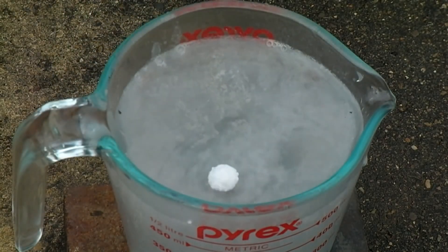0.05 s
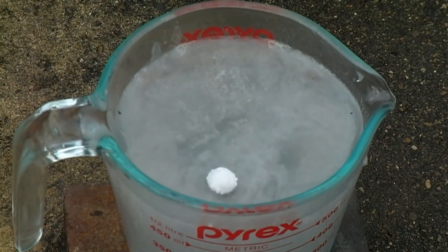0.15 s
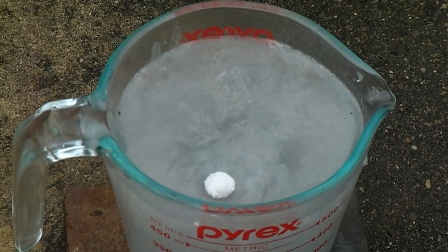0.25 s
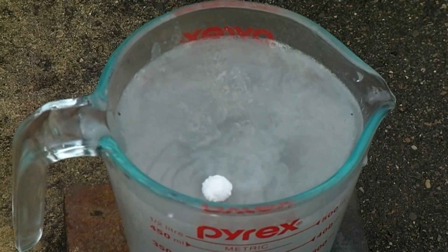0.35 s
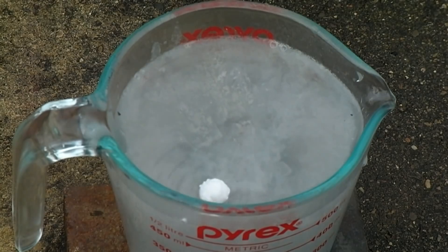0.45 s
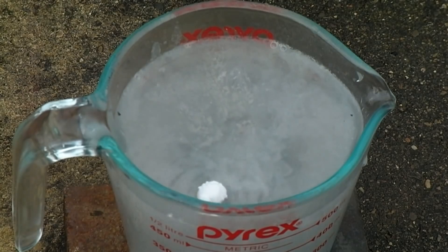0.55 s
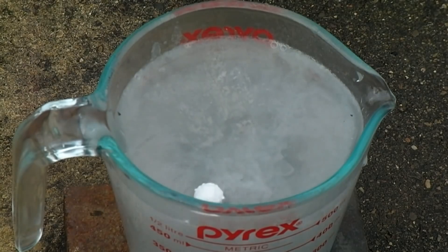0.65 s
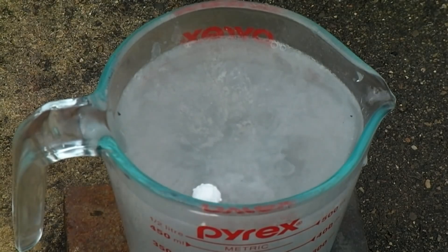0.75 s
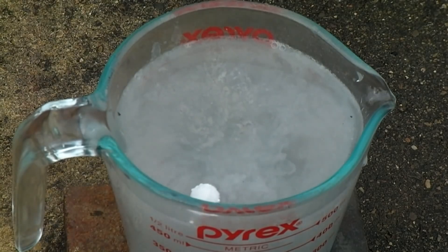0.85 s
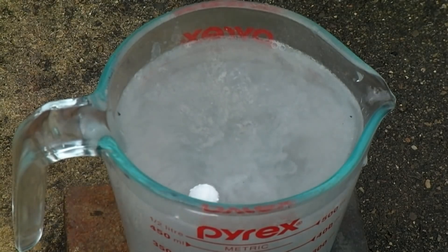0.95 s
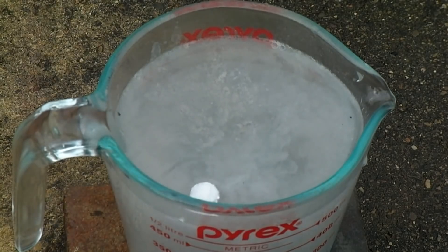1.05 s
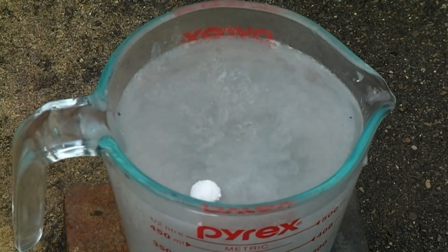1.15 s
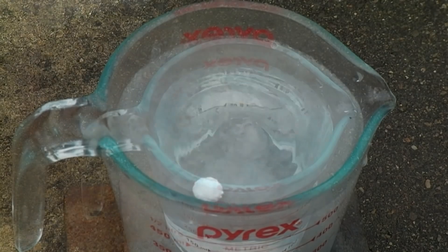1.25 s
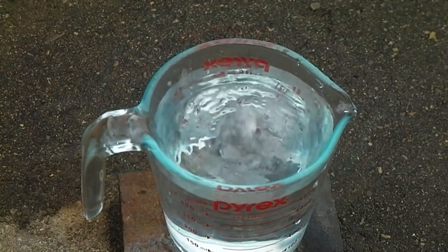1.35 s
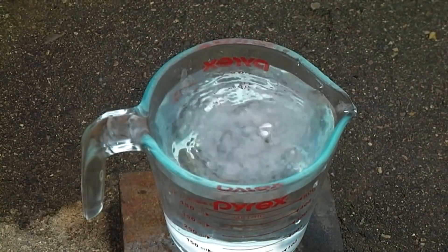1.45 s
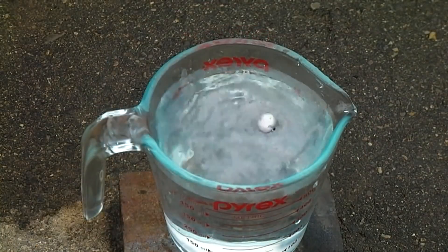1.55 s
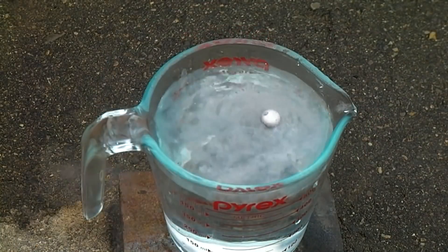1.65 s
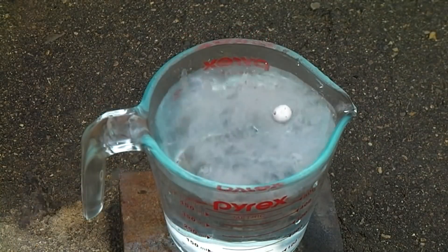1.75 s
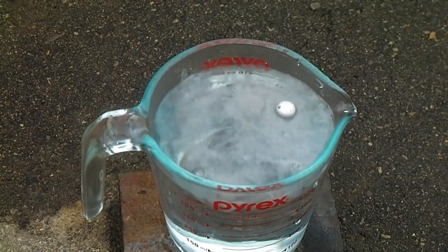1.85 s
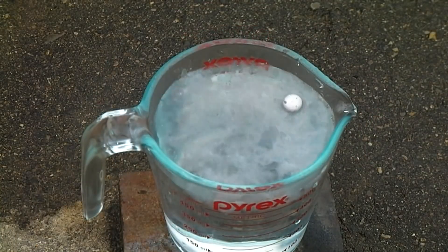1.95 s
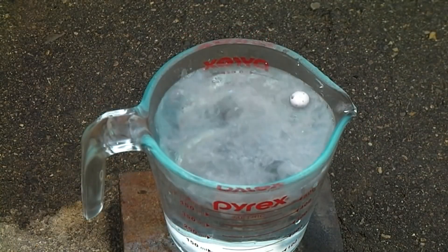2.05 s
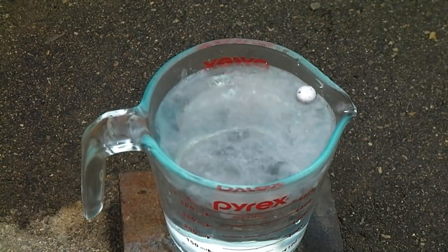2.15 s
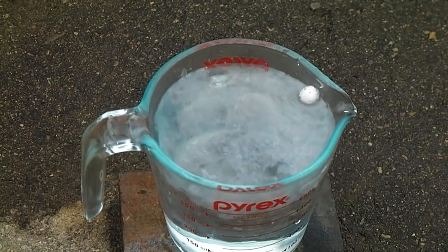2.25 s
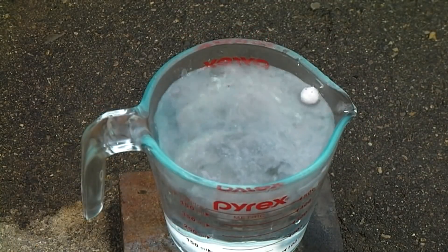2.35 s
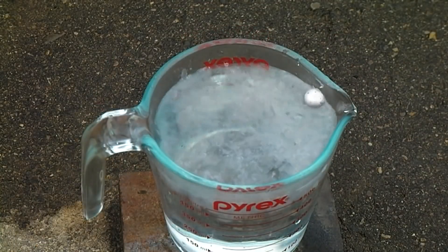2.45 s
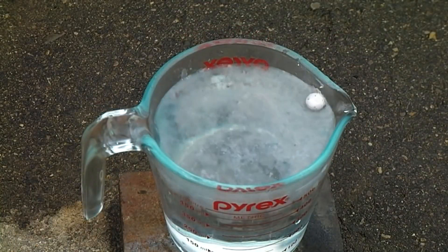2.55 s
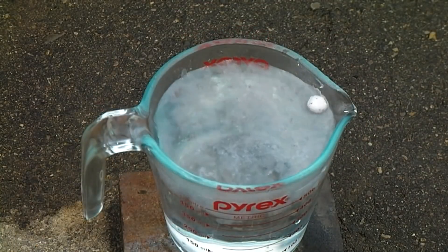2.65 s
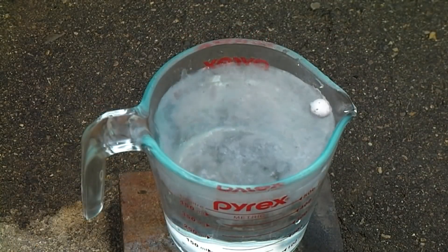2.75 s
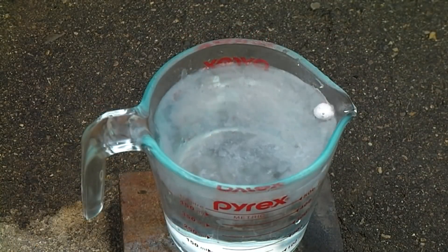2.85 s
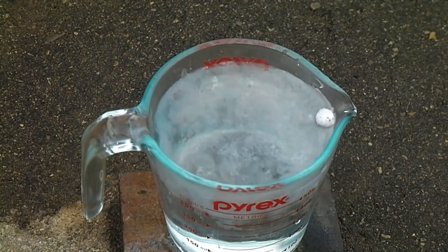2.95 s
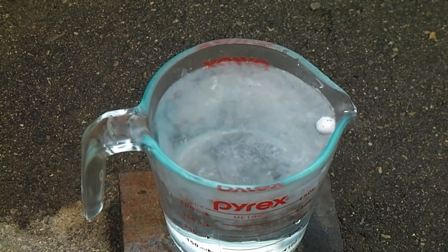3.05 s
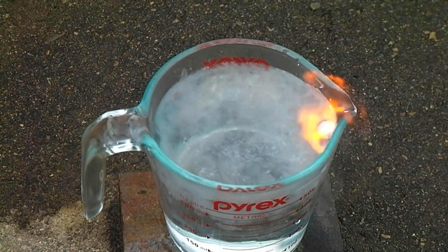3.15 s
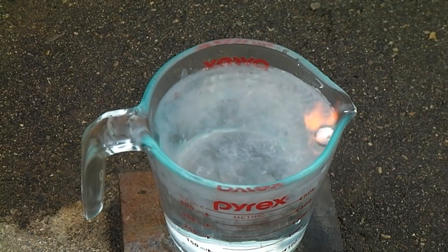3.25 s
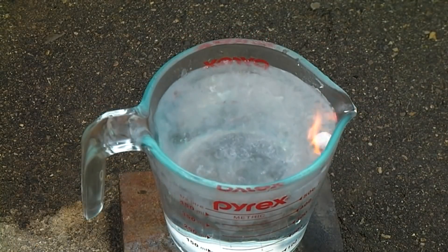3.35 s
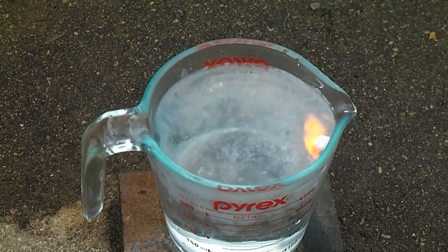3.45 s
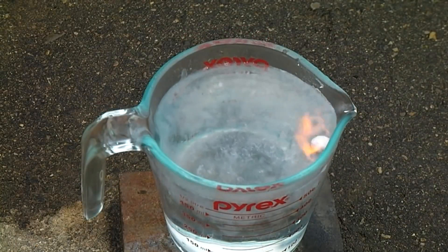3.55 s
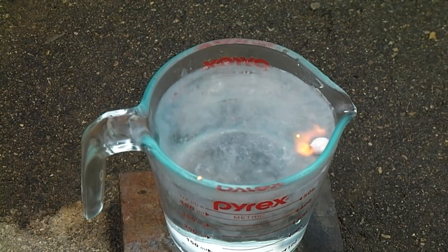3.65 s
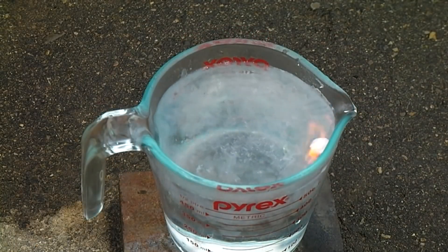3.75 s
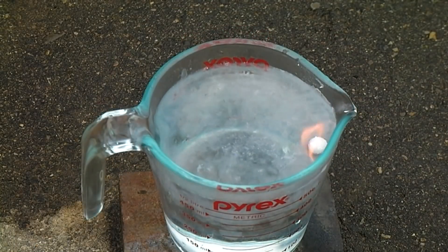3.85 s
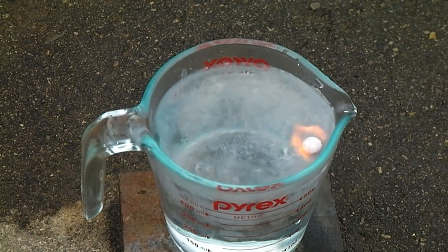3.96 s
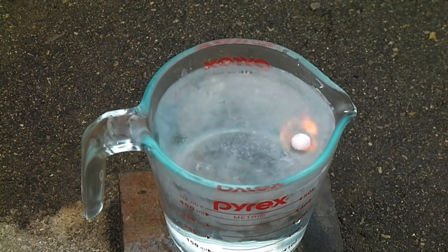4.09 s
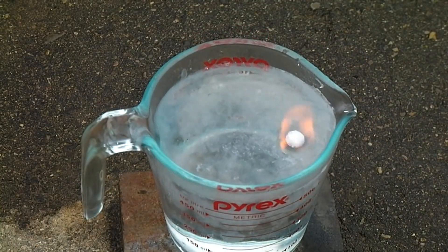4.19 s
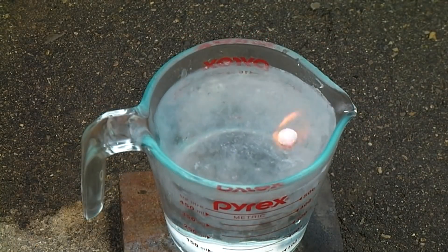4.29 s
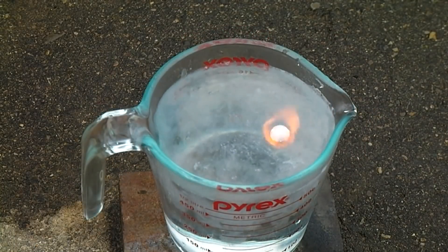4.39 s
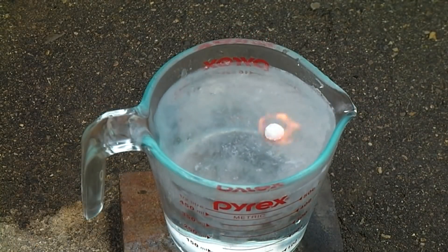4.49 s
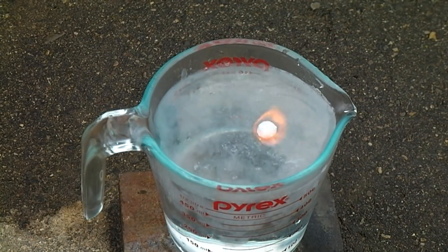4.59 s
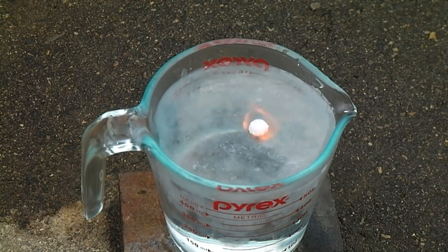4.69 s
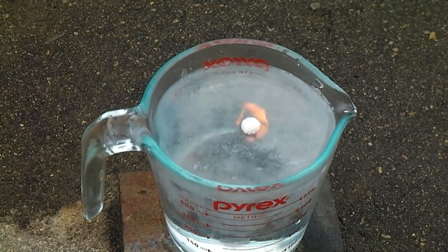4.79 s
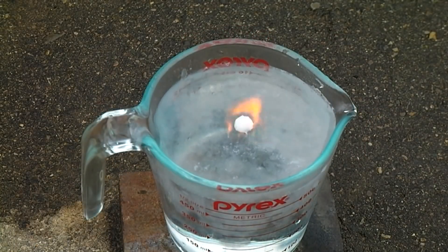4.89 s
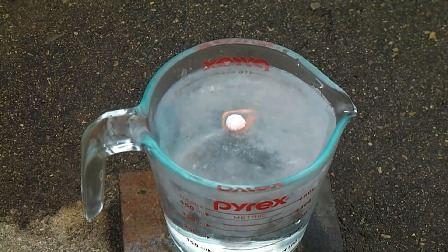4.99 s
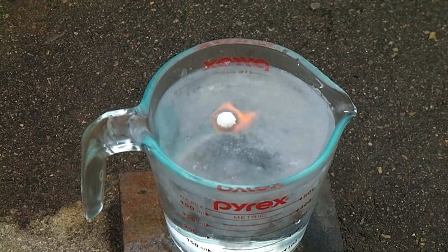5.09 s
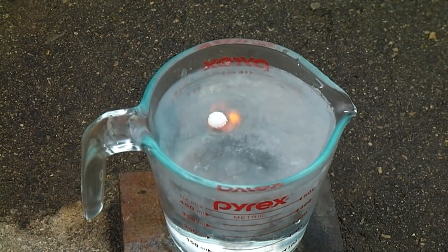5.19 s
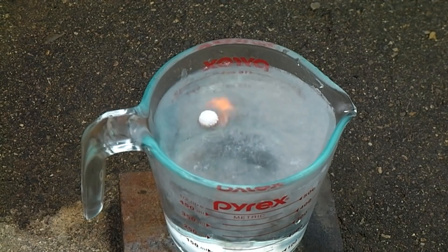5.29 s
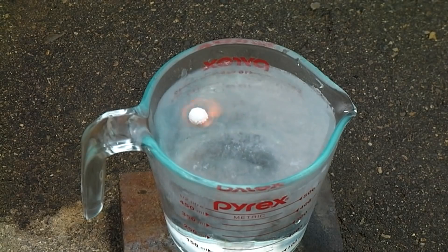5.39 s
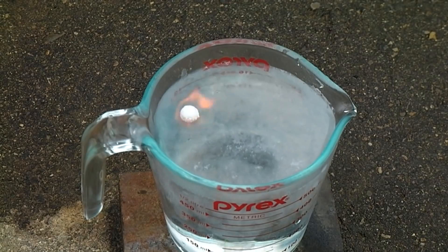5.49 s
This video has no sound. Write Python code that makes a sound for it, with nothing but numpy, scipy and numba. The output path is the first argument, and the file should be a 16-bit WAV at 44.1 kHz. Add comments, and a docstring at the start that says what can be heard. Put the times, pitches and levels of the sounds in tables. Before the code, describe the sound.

Outdoors, close to a stereo microphone, sodium fizzes steadily on water in a glass jug while a faint, far machine hum fades. The fizz cuts out briefly; another lump lands with a small plip and hisses in surges, spitting as it wanders. A single sharp pop marks the gas catching fire. Afterwards the hiss is quieter and sputtering, with fine bubble crackle and a slight low flutter, over a weak distant rumble.

```python
"""A close, fizzing hiss: sodium skates on water in a glass jug outdoors, just before a microphone pair.
Hydrogen and steam escape from under it in tiny bursts, and bubbles crackle. The hiss stops abruptly;
a fresh lump plops in, fizzes and spits, then its gas lights with one sharp pop and it burns more quietly.
The jug colours the hiss as the lump wanders. Far behind lie a low rumble and a machine hum that fades."""
import sys
import numpy as np
from scipy import signal
from scipy.fft import rfft, irfft
from scipy.io import wavfile
from scipy.ndimage import uniform_filter1d
from numba import njit

SR = 44100
rng = np.random.default_rng(int(sys.argv[2]) if len(sys.argv) > 2 else 0)


def generate_wav(signal):
    """Clip the signal to [-1, 1] and save it as 16-bit WAV at the path in sys.argv[1]."""
    frames = np.transpose(np.atleast_2d(signal))
    scaled = np.clip(frames, -1, 1) * 32767
    pcm = np.round(scaled).astype(np.int16)
    wavfile.write(sys.argv[1], SR, pcm)


N = 243873
T = np.arange(N) / SR

# far-off rumble: freq_hz, gain_db
RUMBLE_SPECTRUM = [(20, -5), (35, -9.5), (52, -6.5), (80, 2), (120, 1.5), (160, -3), (200, -12.5),
                   (270, -18), (390, -6.5), (600, -16.5), (1200, -16.5), (4000, -21)]
# its course: time_s, relative_db
RUMBLE_LEVELS = [(0, -51.5), (1.4, -51), (1.9, -53), (2.25, -55), (3.2, -54), (5.53, -53.5)]
# distant machine: time_s, pitch_hz, level_db
MACHINE_HUM = [(0, 130.2, -45.5), (.55, 131.2, -49.5), (1.2, 129.9, -54), (1.4, 127, -60), (1.6, 129, -95)]
# flutter of the burning gas: time_s, level_db
FLAME_LEVELS = [(3.25, -85), (3.9, -73), (4.1, -52.5), (4.35, -53), (4.55, -72), (5.0, -57), (5.53, -54)]
# air trapped by the landing lump: start_s, level_db, pitch_hz, hold_s, decay_s, glide_hz_per_s
AIR_POCKETS = [(1.426, -30, 2230, 0.0063, .0015, 10000), (1.4693, -28.5, 1870, 0.0021, 0.012, 92000)]
# water rocking in the jug: centre_s, level_db, half_length_s
WATER_SLOSHES = [(1.78, -55.5, 0.19), (1.944, -57, 0.056), (2.343, -52, 0.061)]
# spits of gas and droplets: start_s, relative_db, pitch_hz, decay_s
GAS_SPITS = [(1.355, -19.5, 9500, 0.0016), (1.393, -35, 1000, 0.0047), (1.499, -27.5, 4470, 0.019),
             (1.757, -36.5, 1370, 0.01), (1.795, -40, 2500, .002), (1.896, -39.5, 470, 0.0072),
             (1.944, -37.5, 899, 0.015), (2.438, -37.5, 1400, 0.016), (2.473, -31, 1510, 0.0045),
             (2.664, -36.5, 447, 0.0042), (2.858, -42, 800, 0.025), (3.286, -21, 4200, 0.00079),
             (3.295, -21.5, 3800, 0.0024), (3.353, -37, 970, 0.014), (3.805, -38, 1120, 0.0055),
             (3.823, -36, 950, .007), (4.3, -36.5, 1200, .004), (4.987, -38.5, 930, 0.0054)]
# air in the jug, rung by the pop: pitch_hz, level_db, t60_s
POP_RING = [(118, -17.5, 0.022), (387, -18.5, 0.014), (787, -25.5, 0.033), (985, -25, 0.023),
            (1440, -5.5, 0.0052), (2080, -15.5, 0.0077), (2690, -16, 0.014), (3760, -15.5, 0.017),
            (4060, -20.5, 0.019)]
# air modes over the water, by the lump's place: centre_hz, width_hz, near_wall_db, middle_db, far_wall_db
AIR_MODES = [(3200, 660, 4, -1.5, -1), (3910, 410, -6, -2, 8.5), (4210, 330, 6.5, 0.5, 2),
             (5010, 600, -1.5, 6.5, 4.5)]
# the lump's path and the bands the glass cancels:
# time_s, place (-1 near wall, 1 far wall), low_hollow_hz, low_hollow_gain_db, high_hollow_hz
LUMP_PATH = [(0, -0.65, 2290, -23, 4670), (1.35, -0.95, 2150, -28, 4350), (1.47, 0.45, 3420, -2.5, 4300),
             (2.5, 0.54, 3700, 1.5, 4760), (3.1, 0.91, 3380, -8.5, 6440), (3.5, 1, 3120, -6, 5100),
             (4.2, 0.79, 3120, -6, 4970), (4.5, 0.72, 3300, -6, 5600), (4.75, .4, 3600, -3, 7200),
             (4.95, .05, 4180, -28, 8040), (5.33, .1, 4320, -26, 8150), (5.53, 0.18, 4540, 2, 7850)]
# gas from the fresh lump: time_s, relative_db
FRESH_FLOW = [(1.5, -33.5), (1.8, -34), (2.15, -36), (2.27, -30), (2.8, -30.6), (3.3, -32.5)]
# gas from the burning lump: time_s, relative_db
BURNING_FLOW = [(3.4, -45.5), (3.7, -36), (3.88, -42.5), (4.68, -42), (5.07, -35.5), (5.25, -38.5),
                (5.53, -37.5)]
# the lump touches fresh water and the gas surges: centre_s, rise_db, half_length_s
GAS_SURGES = [(1.606, 4.5, 0.044), (1.741, 6, 0.05), (2.36, 1.2, 0.06), (2.463, 2.5, .025), (3, 2.5, 0.051),
              (3.178, 2, .02), (3.82, 5, 0.052), (3.958, 5.5, 0.019), (4.273, 4, 0.047), (4.482, 3.5, .025),
              (4.615, 5.5, 0.027), (4.74, 3, 0.054), (4.91, 2.5, .03), (5.426, 2, 0.037)]
# breaking bubbles: freq_hz, gain_db
CRACKLE_SPECTRUM = [(250, -23), (650, -15.5), (1000, -5), (1450, 1), (1850, -1), (2500, 2.5), (4000, -0.5),
                    (7000, -5), (15000, -33)]
# escaping gas: freq_hz, gain_db
HISS_SPECTRUM = [(1000, -33), (1800, -18), (2400, -6), (3300, -6.5), (4200, -8), (6400, -1), (7500, -6.5),
                 (8900, 1), (9800, -2.5), (10700, 1.5), (11600, 2), (12600, -0.5), (14000, 1.5),
                 (15700, -3.5)]
# microphone pair: freq_hz, left_minus_right_db
MIC_BALANCE = [(100, 1.7), (1000, .3), (3600, 0), (4600, -1.5), (6500, -5.2), (7800, -2.5), (8700, -3.8),
               (9700, -1.2), (11000, -4.2), (12600, -.2), (14000, -1.8), (16000, -1.8)]

STOP_S, WET_S, POP_S = 1.37, 1.472, 3.2987  # first hiss stops, fresh lump reacts, gas ignites
OPENING_GAS_DB = -35  # on the relative scale of the flow tables


def undb(db):
    """Decibels to gain."""
    return 10 ** (np.asarray(db) / 20)


def unit(x):
    """Scale to rms 1."""
    return x / np.sqrt(np.mean(x ** 2))


def curves(rows):
    """Each column of a table, joined by straight lines in time."""
    times, *columns = np.transpose(rows)
    return [np.interp(T, times, column) for column in columns]


def since(s):
    """Seconds since a moment, 0 before it."""
    return np.maximum(T - s, 0)


def swell(s, half_length):
    """A bell-shaped rise and fall about a moment."""
    return np.exp(-((T - s) / half_length) ** 2)


def walk(rate):
    """Random drift with rms 1 and about `rate` turns a second."""
    return unit(np.interp(T * rate, np.arange(N), rng.standard_normal(N)))


def colour(x, spectrum, power=1):
    """Filter by a (freq_hz, gain_db) spectrum."""
    hz, db = np.transpose(spectrum)
    bins_hz = np.maximum(np.fft.rfftfreq(N, 1 / SR), 1)
    gain_db = np.interp(np.log(bins_hz), np.log(hz), db)
    return irfft(rfft(x) * undb(power * gain_db), N)


@njit
def svf(x, hz, width):
    """State-variable band-pass with moving centre and width, gain 1 at the centre."""
    y = np.empty(len(x))
    band_state, low_state = 0., 0.
    for i in range(len(x)):
        g, damping = np.tan(np.pi * hz[i] / SR), width[i] / hz[i]
        passed = (band_state + g * (x[i] - low_state)) / (1 + g * (g + damping))
        band_state = 2 * passed - band_state
        low_state += 2 * g * passed
        y[i] = damping * passed
    return y


def band(x, hz, width):
    """Band-pass for steady or moving settings in Hz."""
    return svf(x, hz + np.zeros(N), width + np.zeros(N))


def bell(x, hz, width, db):
    """Lift or dip one band."""
    return x + (undb(db) - 1) * band(x, hz, width)


def noise(hz, width):
    """Noise in one steep-sided band, rms 1."""
    return unit(band(band(rng.standard_normal(N), hz, width), hz, width))


def clicks(rate, scatter_db):
    """Randomly timed clicks of uneven size, about `rate` a second."""
    happens = rng.random(N) < rate / SR
    signs = rng.choice([-1, 1], N)
    sizes = undb(scatter_db * np.clip(rng.standard_normal(N), -2, 2))
    return unit(happens * signs * sizes)


def spread(mid, side, side_db):
    """Left and right from a shared and an opposed part."""
    return mid + undb(side_db) * side * np.array([[1], [-1]])


def reflections(x, t60_s):
    """A dense, short tail of reflections."""
    t = T[:SR // 4]
    tail = rng.standard_normal(len(t)) * undb(-60 * t / t60_s)
    return signal.fftconvolve(x, tail / np.linalg.norm(tail))[:N]


def far_rumble():
    """Low outdoor rumble from far off, widest in the midrange."""
    level_db, = curves(RUMBLE_LEVELS)
    mid, side = (unit(colour(rng.standard_normal(N), RUMBLE_SPECTRUM)) for _ in range(2))
    side = side + 3.5 * band(side, 660, width=980)
    return spread(mid, side, side_db=-13) * undb(level_db + 5 + 1.4 * walk(14))


def machine_hum():
    """A distant machine's hum wavers and dies away."""
    hz, level_db = curves(MACHINE_HUM)
    phase = 2 * np.pi * np.cumsum(hz + 0.68 * walk(6.6)) / SR
    return np.sqrt(2) * np.sin(phase) * undb(level_db + 0.6 * walk(7.4))


def flame():
    """A small flame in the jug gives a low, uneven flutter."""
    level_db, = curves(FLAME_LEVELS)
    return noise(123, width=53) * undb(level_db + 3.4 * walk(16))


def plips(gulp_hz=744, gulp_db=-9, gulp_s=0.012, gulp_glide_s=0.0024, attack_s=0.00068):
    """Each air pocket under the landing lump gulps and shrinks: its ring sweeps up and frays into hiss."""
    out = np.zeros(N)
    for start, db, pitch, hold, decay, glide in AIR_POCKETS:
        ahead = np.maximum(start - T, 0)
        hz = gulp_hz + (pitch - gulp_hz) * np.exp(-ahead / gulp_glide_s) + glide * since(start)
        ring = noise(np.minimum(hz, 5000), width=450)
        ring /= np.sqrt(uniform_filter1d(ring ** 2, size=128) + 1e-12)  # steadied into a tone
        fray = 0.53 * noise(1960, width=2500)
        attack = np.maximum(np.exp(-ahead / attack_s), undb(gulp_db) * np.exp(-ahead / gulp_s))
        out += (ring + fray) * undb(db) * attack * np.exp(-since(start + hold) / decay)
    return out


def slosh():
    """Water rocks in the jug after the lump lands."""
    rocking = sum(undb(db) * swell(s, half_length) for s, db, half_length in WATER_SLOSHES)
    return noise(410, width=280) * rocking * undb(2 * walk(40))


def spits(attack_s=0.0001):
    """Larger pockets of gas burst as short, broad puffs."""
    out = np.zeros(N)
    for start, db, hz, decay in GAS_SPITS:
        age = since(start)
        envelope = np.exp(-age / decay) * (1 - np.exp(-age / attack_s))
        out += undb(db - 0.5) * noise(hz, width=1.28 * hz) * envelope
    return out


def pop(echo_s=0.0046, echo_db=-13, crack_db=-16, crack_s=0.0001, lowest_hz=85):
    """Hydrogen ignites: a pressure spike rings the air in the jug and comes back from the ground."""
    age = since(POP_S)
    ring = sum(undb(db - 60 * age / t60) * np.sin(2 * np.pi * hz * age) for hz, db, t60 in POP_RING)
    ring *= 1 - np.exp(-age / 0.0002)  # builds while the flame front crosses the gas
    # the spike is followed by an equal, slower suction
    progress = age / crack_s
    spike = undb(crack_db) * progress * (1 - progress / 2) * np.exp(1 - progress)
    # so small a source radiates little deep bass
    blast = signal.sosfilt(signal.butter(2, lowest_hz, "high", fs=SR, output="sos"), ring + spike)
    ground_echo = undb(echo_db) * np.interp(T - echo_s, T, blast)
    return -(blast + ground_echo)


def jug(x, hollow_width_hz=580):
    """The lump drives the jug's modes by where it floats; echoes from the glass hollow out two bands."""
    place, low_hz, low_db, high_hz = curves(LUMP_PATH)
    for hz, width, *place_db in AIR_MODES:
        x = bell(x, hz, width, np.interp(place, [-1, 0, 1], place_db))
    x = bell(x, low_hz, hollow_width_hz, low_db)
    high_db = 1 - 8.5 * np.abs(place)  # deeper towards the walls
    return bell(x, high_hz, hollow_width_hz, high_db)


def alight(rise_s=0.035):
    """0 before the gas ignites, soon 1 after it."""
    return 1 - np.exp(-since(POP_S) / rise_s)


def hiss_level_db(sag_db_per_s=1.1, stop_drop_db=4.5, stop_db_per_s=104, wetting_s=0.027):
    """The first hiss sags slightly, then stops abruptly; the fresh lump wets, surges, is softer alight."""
    first_db = OPENING_GAS_DB - sag_db_per_s * T
    first_db -= stop_drop_db * (T > STOP_S) + stop_db_per_s * since(STOP_S)
    fresh_db, = curves(FRESH_FLOW)
    burning_db, = curves(BURNING_FLOW)
    surge_db = sum(db * swell(s, half_length) for s, db, half_length in GAS_SURGES)
    second_db = fresh_db + (burning_db - fresh_db) * alight() + surge_db
    wet = 1 - np.exp(-since(WET_S) / wetting_s)
    return 20 * np.log10(undb(first_db) + wet * undb(second_db))


def bubble_crackle(bursts, gas_db, base_db=-44, follow=0.21, foam_db=6, boil_db=1):
    """Each burst breaks tiny bubbles; the landing's foam and boiling under the flame add to them."""
    foam = (T > WET_S) * swell(WET_S, half_length=0.41)
    level_db = base_db + follow * (gas_db - OPENING_GAS_DB) + foam_db * foam + boil_db * alight()
    crackle = colour(bursts * clicks(rate=2800, scatter_db=2.5), CRACKLE_SPECTRUM)
    return unit(crackle) * undb(level_db)


def gas_hiss(bursts, gas_db, flicker_db=1.13, wander_db=2.1):
    """Hydrogen and steam jet out from under the lump as a gritty hiss."""
    jet = rng.standard_normal(N) + 0.28 * clicks(rate=3000, scatter_db=22)
    hiss = colour(bursts * jet, HISS_SPECTRUM)
    # each burst leaves by a different gap, so the colour flickers
    for hz in (3020, 6100, 10200, 13200):
        hiss = bell(hiss, hz, width=5600, db=flicker_db * walk(130))
    hiss = unit(hiss)
    # the flame makes the treble wander
    for hz in (6540, 8560, 10700, 13000):
        hiss = bell(hiss, hz, width=1000, db=wander_db * alight() * walk(7))
    # a stronger jet is brighter: the lower hiss falls behind
    hiss = bell(hiss, 3860, width=4400, db=0.28 * (OPENING_GAS_DB - gas_db))
    return hiss * undb(gas_db + 2.5)


def fizz(burst_db=1.45, burning_burst_db=1.6, sputter_db=0.4):
    """Gas escapes in bursts a few ms long, harder once alight; they drive both hiss and crackle."""
    gas_db = hiss_level_db()
    depth_db = burst_db + (burning_burst_db - burst_db) * alight()
    bursts = unit(undb(depth_db * noise(84.5, width=104) + sputter_db * walk(14)))
    return gas_hiss(bursts, gas_db) + bubble_crackle(bursts, gas_db)


def scene():
    """The jug stands close in front; fizz scattered off its rim reaches each microphone differently."""
    events = plips() + slosh() + spits() + pop()
    off_rim = jug(fizz())
    off_rim += 2.14 * band(off_rim, 6070, width=2600)
    close_fizz = spread(jug(fizz()), off_rim, side_db=-15.5)
    close_events = spread(events, reflections(events, t60_s=0.03), side_db=-13)
    return close_fizz + close_events + flame() + far_rumble() + machine_hum()


def record(dry, notch_hz=7870, notch_width_hz=340, low_cut_hz=38, top_hz=15700):
    """The two microphones differ in the treble; the recorder has a deep notch and cuts both ends."""
    mics = [colour(dry[0], MIC_BALANCE, power=1 / 2), colour(dry[1], MIC_BALANCE, power=-1 / 2)]
    for _ in range(2):
        mics = [x - band(x, notch_hz, notch_width_hz) for x in mics]
    trimmed = signal.sosfilt(signal.butter(2, low_cut_hz, "high", fs=SR, output="sos"), mics)
    return signal.sosfilt(signal.ellip(12, 0.2, 75, top_hz, fs=SR, output="sos"), trimmed)


dry = scene()
out = record(dry)
generate_wav(out)
```